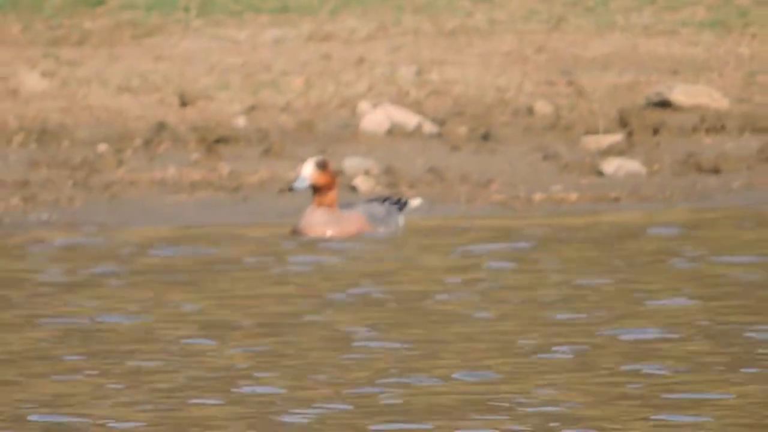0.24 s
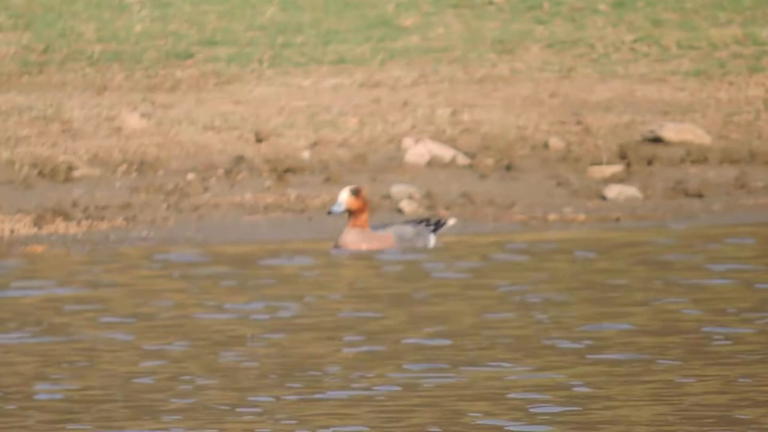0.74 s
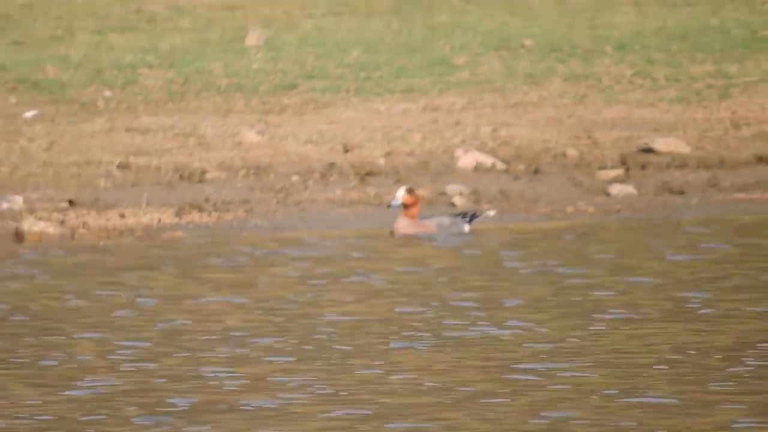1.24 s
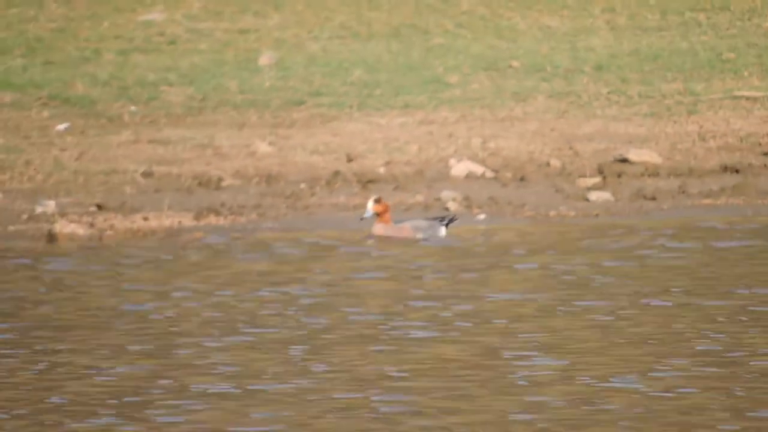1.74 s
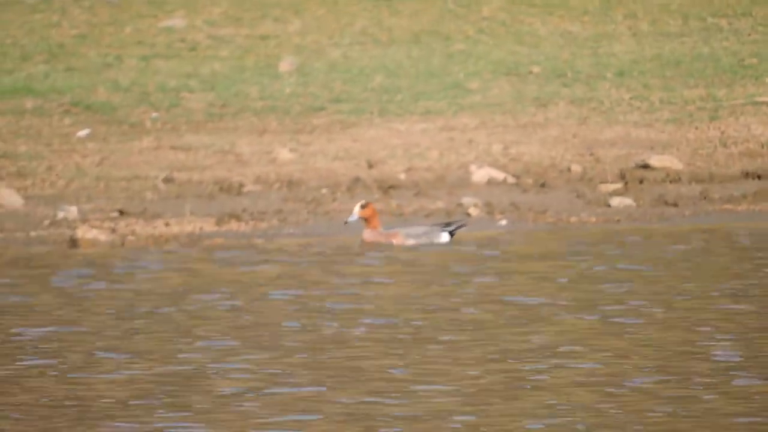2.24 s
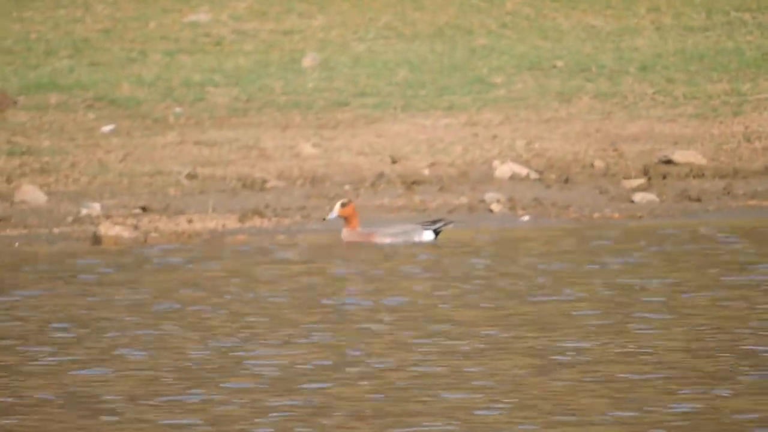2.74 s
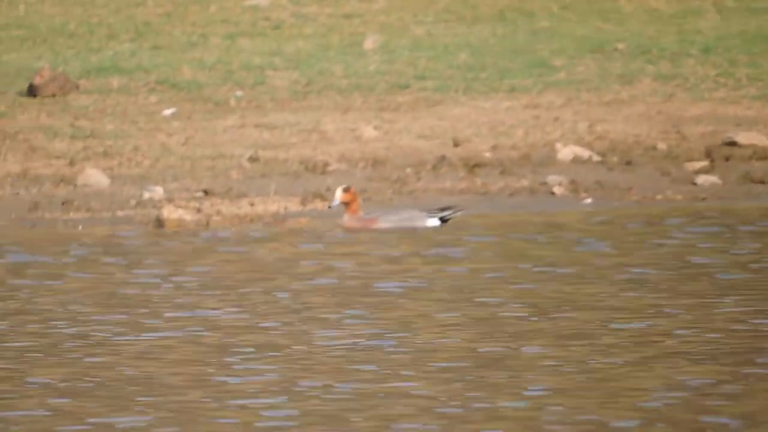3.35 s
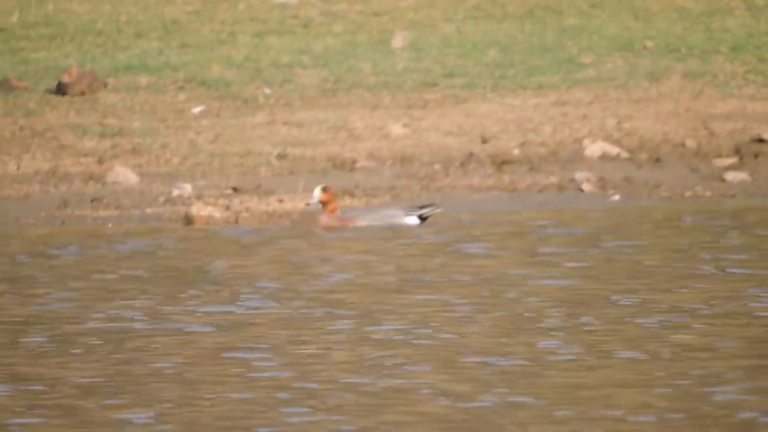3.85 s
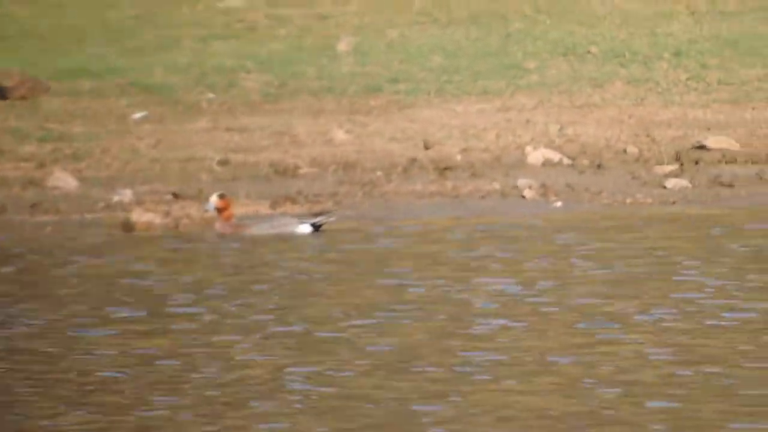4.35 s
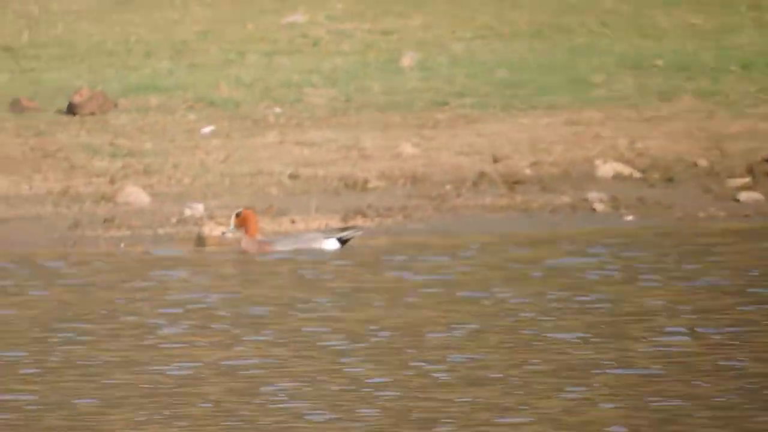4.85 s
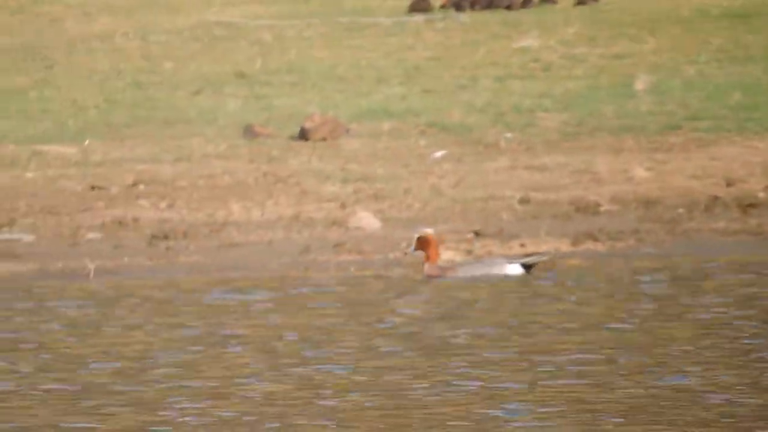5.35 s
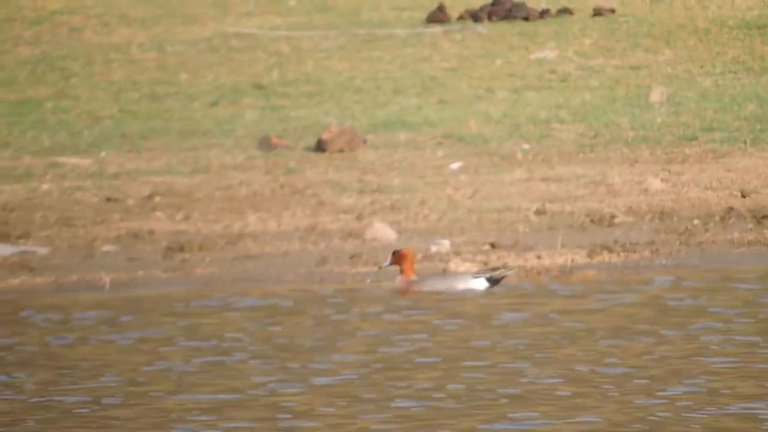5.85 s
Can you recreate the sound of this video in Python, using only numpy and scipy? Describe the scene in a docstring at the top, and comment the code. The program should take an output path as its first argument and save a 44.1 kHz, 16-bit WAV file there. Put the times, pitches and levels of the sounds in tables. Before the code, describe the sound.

Two drake wigeons call across a pond, heard in stereo through a camera's small microphones. From 0 to 1.4 seconds their high, reedy whistles crowd together: brief stuttering pips, smooth peeps, and slides that drop sharply then flick upward. One bird repeats a pattern of pips and a slide near 1.6-2.1 and 2.3-2.8 seconds; the other overlaps with a longer stuttering slide at 2.8. Similar, somewhat fainter groups follow at 3.3-3.8, 4.2-4.7 and 5.0-5.5, with the other bird answering around 3.9-4.3, and a last pip begins just before 6. Soft ripples and airy hiss continue throughout, with faint echoes from the bank. Low wind puffs the right side from 1.3 to 2, then buffets strongly from 2.7, gusting on and off to the end. Tiny dry ticks appear irregularly, the sharpest near 3.9; faint hiss swells around 5-5.8.

```python
"""On a pond, wigeon drakes whistle: their notes start as a stutter of reedy pulses, then hold as a pip
or slide down and flick up. A leader and a companion trade calls, the companion with runs of pips.
Each whistle is a sine at twice the pitch plus other harmonics, most of them weaker; ripples and the bank
send back faint copies. Shaped noise makes the open air, ripples, wind and soft hiss. Gusts buffet the right
one of a camera's two microphone ports, and its body ticks now and then with a snap, a ring and a thump."""
import sys
import numpy as np
from scipy import signal
from scipy.fft import rfft, irfft, next_fast_len
from scipy.io import wavfile
from scipy.ndimage import map_coordinates

SR = 44100
rng = np.random.default_rng(int(sys.argv[2]) if len(sys.argv) > 2 else 0)


def materialize(psi):
    """Save the field psi as 16-bit PCM at rate SR to the path in sys.argv[1].

    A 1-D psi becomes a single channel; in a 2-D psi each row is a channel.
    """
    bounded = np.clip(np.atleast_2d(psi).T, -1, 1)
    quanta = np.round(bounded * 32767).astype(np.int16)
    wavfile.write(sys.argv[1], SR, quanta)


N = 268701  # length in samples


def amp(db):
    """Turn decibels into a gain."""
    return 10 ** (np.asarray(db) / 20)


def unit(x):
    """Scale a sound to rms 1."""
    return x / np.sqrt(np.mean(x ** 2) + 1e-20)


def along(points, hz, axis=1):
    """Read one column of a frequency table, with frequency spaced by ratio as the ear does."""
    table = np.transpose(points)
    return np.interp(np.log(hz + 1), np.log(table[0]), table[axis])


def curve(rows):
    """Join the points of a time table with straight lines, one value per sample."""
    return np.interp(np.arange(N) / SR, *np.transpose(rows))


def clock(length):
    """Sample times of a short sound, in seconds."""
    return np.arange(max(int(length * SR), 8)) / SR


def wobble(rate, size=N):
    """A smooth random curve with `rate` random points a second."""
    points = rng.standard_normal(int(N * rate / SR) + 4)
    return map_coordinates(points, [np.arange(size) * rate / SR])


def add(track, s, x):
    """Mix x into the track at time s."""
    start = max(round(s * SR), 0)
    part = x[..., :N - start]
    track[..., start:start + part.shape[-1]] += part


def filtered(x, response):
    """Change the strength and timing of each frequency in x by a given response."""
    m = next_fast_len(N + SR // 4)  # room for late sound
    return irfft(rfft(x, m) * response(np.fft.rfftfreq(m, 1 / SR)), m)[..., :N]


def sides(pan_db):
    """Left and right gains that keep the total power the same; positive dB favours the left."""
    g = amp(np.array([pan_db, -pan_db]) / 2).reshape(2, -1)
    return g / np.sqrt(np.mean(g ** 2, axis=0))


def rush(spectrum, alike):
    """Coloured stereo noise of rms 1: a shared part plus a part that is opposite on the two sides."""
    def weights(hz):
        turn = np.arccos(np.clip(along(alike, hz), -1, 1)) / 2
        return amp(along(spectrum, hz)) * [np.cos(turn), np.sin(turn)]
    mid, side = filtered(rng.standard_normal((2, N)), weights)
    return unit(np.array([mid + side, mid - side]))


def fade(t, attack, release):
    """Straight-line rise and fall at the ends of a note, given in seconds."""
    return np.clip(t / attack, 0, 1) * np.clip((t[-1] - t) / release, 0, 1)


def reed(t, pitch, opening, overtones, overtone_db, dulling_db=0, chirp=0, jitter=0.0096, shimmer_db=2.5):
    """A whistle on the second harmonic; the others need a wider opening and flutter each in its own way."""
    phase = 2 * np.pi * np.cumsum(pitch * (1 + jitter * wobble(542, len(t)))) / SR
    bend = 2 * np.pi * np.cumsum(pitch * chirp) / SR
    whistle_level = amp(shimmer_db / 2 * wobble(140.5, len(t)))
    tone = opening * np.sin(2 * (phase + bend)) * whistle_level
    for k, db in overtones:
        k = round(k)
        if k > 1:
            level = db + overtone_db - dulling_db * np.log2(k / 2)
        else:
            level = db + overtone_db * 0.12  # the fundamental barely follows the overtones
        flutter = shimmer_db * wobble(152.5, len(t))
        tone += amp(level + flutter) * opening ** 2 * np.sin(k * phase)
    return np.sqrt(2) * tone


# How the two ports hear each bird: f/Hz, left-right level/dB, phase by which left leads/radians
COMPANION_AT_PORTS = [(1260, 10, -1.5), (2200, -4.5, -2), (2500, 1, -1.73), (2600, 3, -2), (3860, 6, -3),
                      (5490, -7.5, -5.5), (6840, -3, -8.5), (7500, -6, -5)]
LEADER_AT_PORTS = [(1340, 15, -1.5), (1800, 2, -2.5), (2160, -5.5, -1.5), (2710, -9, -5), (2800, 3, -4.5),
                   (4320, 0.5, -2), (5150, -12, -5), (6200, -4, -5), (8150, -5, -4.5)]


def at_ports(x, ports):
    """The camera body shades and delays each frequency differently for the two ports."""
    def response(hz):
        lead = along(ports, hz, axis=2)
        return sides(along(ports, hz)) * np.exp(.5j * np.outer([1, -1], lead))
    return filtered(x, response)


# Short smooth whistles (peeps, the end of a pip and the flat end of a slide):
# t/s, length/s, first pitch f/Hz, last pitch f/Hz, level/dB, overtones level/dB
# (as for every whistle here, the sine of the whistle sounds at twice the pitch)
SMOOTH_WHISTLES = [(0, 0.011, 1337, 1250, -44.5, -4.5), (0.108, 0.065, 1250, 1130, -56.5, -1.5),
                   (0.555, 0.036, 1275, 1270, -46, -9), (0.606, 0.03, 1323, 1216, -42, -12.5),
                   (0.639, 0.025, 1072, 1090, -40, -23), (2.465, 0.032, 1240, 1220, -50, -2.5),
                   (2.514, 0.03, 1310, 1170, -42, -11), (3.709, 0.035, 1260, 1236, -47, -4),
                   (3.761, 0.035, 1330, 1136, -43, -6.5)]


def smooth_whistles():
    """Short unstuttered whistles whose pitch slides, most of them downward and faster toward the end."""
    overtones = [(1, -16.5), (3, 4), (4, -4.5), (5, -18.5), (6, -15)]  # multiple of the pitch, level/dB
    out = np.zeros(N)
    for s, length, from_hz, to_hz, db, overtone_db in SMOOTH_WHISTLES:
        t = clock(length)
        pitch = from_hz + (to_hz - from_hz) * (t / t[-1]) ** 2
        whistle = reed(t, pitch, fade(t, 0.0011, 0.0051), overtones, overtone_db)
        add(out, s, amp(db) * whistle)
    return at_ports(out, COMPANION_AT_PORTS)


# Wash of ripples on the shore, before its gain and wobble: t/s, level/dB
RIPPLE_WASH = [(0.0, -65), (0.42, -62), (0.63, -65.5), (3.02, -64.5), (3.12, -63), (5.21, -66.5),
               (6.09, -63.5)]
# Colour of the ripple noise: f/Hz, relative level/dB
RIPPLE_COLOUR = [(300, -19), (700, 1.5), (1100, -0.5), (1600, -2.5), (2100, -3), (3000, -11), (9000, -25.5)]
# Colour of the open-air noise: f/Hz, relative level/dB
AIR_COLOUR = [(180, -3), (300, 0), (378, -1.5), (418, -3.5), (519, -3), (825, -13), (1230, -7), (1310, -25),
              (1450, -28), (2090, -23), (2420, -13), (2910, -13), (15800, -26.5)]
# How alike the air sounds on the two sides: f/Hz, likeness (1 = the same)
AIR_LIKENESS = [(60, 0.28), (180, 0.64), (550, 0.39), (1650, 0.12), (4970, 0.52), (15000, 0.4)]


def pond(air_db=-57, wash_db=3):
    """Nearly steady open-air noise and the uneven wash of ripples."""
    wash_level = amp(curve(RIPPLE_WASH) + wash_db + 2.4 * wobble(12))
    wash = wash_level * rush(RIPPLE_COLOUR, [(1000, 0.39)])
    air_level = amp(air_db + 0.17 * wobble(3.08))
    return air_level * rush(AIR_COLOUR, AIR_LIKENESS) + wash


# Light breeze across both ports: t/s, level/dB
BREEZE_LEVEL = [(0, -48.5), (.8, -52), (2.6, -53), (2.85, -44), (3.45, -37.5), (4.2, -37.5), (5.55, -41),
                (5.9, -44.5)]
# Gusts at the right port, before their gains: t/s, length/s, buffet level/dB,
# upper flutter level/dB relative to the buffet
RIGHT_GUSTS = [(0.054, 0.44, -43.5, -18), (1.315, 0.075, -38, -27), (1.418, 0.12, -29.5, -17),
               (1.586, 0.12, -35.5, -5.5), (1.73, 0.11, -28.5, -15.5), (1.95, 0.047, -40, -25),
               (2.726, 0.067, -31, -16), (2.836, 0.06, -25, -0.5), (2.941, 0.18, -26.5, -12.5),
               (3.204, 0.071, -32.5, -5), (3.427, 0.25, -29.5, -3.5), (3.762, 0.055, -27, -16.5),
               (3.894, 0.082, -31, -10), (4.05, 0.066, -35, -10), (4.28, 0.072, -29.5, -6),
               (4.455, 0.106, -31, -7.5), (4.615, 0.053, -38.5, -9.5), (4.744, 0.071, -37.5, 0.5),
               (4.942, 0.18, -31, -4), (5.201, .13, -28, -4), (5.568, 0.065, -29, -13.5),
               (5.818, .23, -31, -10)]
# Colour of the low buffeting: f/Hz, relative level/dB
BUFFET_COLOUR = [(8, -14), (22, -1), (50, 0), (90, -4.5), (130, -11), (190, -27.5), (400, -72.5)]
# Colour of the higher flutter: f/Hz, relative level/dB
FLUTTER_COLOUR = [(70, -6.5), (130, -2), (190, -8.5), (260, -17.5), (400, -33), (900, -76), (3000, -95)]
# Single eddies striking the right port: t/s, peak level/dB
RIGHT_EDDIES = [(1.45, -24.5), (1.648, -21), (2.841, -19), (2.856, -12.5), (2.882, -22), (2.905, -20),
                (2.975, -17), (3.106, -27), (3.594, -14.5), (3.916, -15.5), (3.964, -12), (4.478, -16),
                (4.952, -20.5)]
GUST_RISE_S, GUST_FALL_S = 0.015, 0.018  # time constants of a gust's edges


def wind(buffet_db=0.86, flutter_db=3, breeze_db=0, breeze_flutter_db=-14, breeze_pan_db=4,
         lump_db=5.0, eddy_s=0.0019):
    """A breeze on both ports and gusts on the right one, in lumps, with single eddies that push then pull."""
    t = np.arange(N) / SR
    low = amp(curve(BREEZE_LEVEL) + breeze_db) * sides(breeze_pan_db)
    high = amp(breeze_flutter_db) * low
    for s, length, db, upper_db in RIGHT_GUSTS:
        before = np.minimum(t - s, 0) / GUST_RISE_S
        after = np.maximum(t - s - length, 0) / GUST_FALL_S
        gust = amp(db) * np.exp(before - after)
        # gust and breeze powers add up
        low[1] = np.hypot(low[1], amp(buffet_db) * gust)
        high[1] = np.hypot(high[1], amp(flutter_db + upper_db) * gust)
    lumps = amp(lump_db * np.array([wobble(28), wobble(28)]))
    buffet = unit(np.sqrt(lumps) * rush(BUFFET_COLOUR, [(50, 0.26)]))
    flutter = unit(lumps * rush(FLUTTER_COLOUR, [(150, 0.029)]))
    out = low * buffet + high * flutter
    u = (clock(.04) - .02) / eddy_s  # time from the middle of an eddy, in eddy widths
    push_pull = -1.6 * u * np.exp(-u ** 2 / 2)
    for s, db in RIGHT_EDDIES:
        add(out[1], s - .02, amp(db) * push_pull)
    return out


def stutter(t, rate, length, shut, edge=0.00096, lead=0.0025, closing=1.1):
    """The syrinx (voice organ) opens in pulses whose gaps shrink to nothing; returns opening and pulse kicks."""
    count, phase = np.divmod((t + lead) * rate, 1)
    gap = (1 - np.clip(count / rate / length, 0, 1) ** closing) * shut
    opening = np.clip(np.minimum(phase, 1 - gap - phase) / rate / edge, 0, 1)
    depth = np.clip((length - t) * rate, 0, 1)
    kick = depth * np.exp(-phase / rate / 0.0012)
    return 1 - depth * (1 - opening), kick


def note(t, pitch, rate, length, overtones, overtone_db, dulling_db, chirp, shut,
         rasp=7, rasp_hz=3150, build=0.0478):
    """A stuttered note: as pressure builds in a long trill, each pulse kicks the whistle sharp with a rasp of air."""
    opening, kick = stutter(t, rate, length, shut)
    opening = opening * fade(t, .0007, 0.0035)
    pitch = pitch * (1 - 0.0696 * np.exp(-t / 0.00838))  # starts a little flat
    swell = amp(-5 * np.exp(-t / 0.0056))  # and a little soft
    force = chirp * np.tanh(t / build) * np.tanh((length / 0.1203) ** 2)
    sharp = force * kick * amp(3.02 * wobble(69.0, len(t)))
    rasp_tone = wobble(900, len(t)) * np.sin(2 * np.pi * rasp_hz * t)
    air = rasp * force * np.sqrt(kick) * opening * rasp_tone
    return swell * (reed(t, pitch, opening, overtones, overtone_db, dulling_db, sharp) + air)


# Pips of each bird: t/s, length/s, pitch f/Hz (before it bends at the ends), level/dB before the bird's
# pip gain, overtones level/dB
BIRD_PIPS = {"leader": [(.061, .073, 1451, -42.5, -9.5), (.745, 0.059, 1365, -38, -10),
             (.888, .11, 1326, -38, -9.5), (3.93, 0.05, 1324, -41.5, -6.5)],
             "companion": [(.173, 0.047, 1405, -43.5, -4), (.272, 0.061, 1403, -43.5, -3.5),
             (.381, 0.066, 1418, -42, -7), (1.06, 0.05, 1396, -40, -8.5), (1.167, .062, 1394, -41.5, -6.5),
             (1.593, 0.049, 1379, -42, -10), (1.696, 0.057, 1392, -42.5, -8.5),
             (1.811, 0.066, 1390, -40, -9.5), (2.318, 0.038, 1304, -46, -9.5),
             (2.422, .049, 1427, -43.5, -5), (2.533, 0.066, 1400, -45, -6.5),
             (3.268, 0.058, 1312, -48, -4.5), (3.382, 0.059, 1325, -51.5, 1), (3.498, .069, 1327, -49.5, 1),
             (4.161, 0.0492, 1284, -45.5, -2.5), (4.274, .058, 1318, -49, -1),
             (4.391, 0.067, 1332, -47, -2), (5.0, 0.036, 1246, -47, -7.5), (5.105, .052, 1313, -48.5, -6),
             (5.22, 0.07, 1320, -49, -4.5), (5.981, 0.047, 1253, -49.5, -10)]}
# Slides of each bird: t/s, length/s, starting pitch f/Hz, stutter pulses per s, level/dB before the bird's
# slide gain, overtones level/dB, middle of the fall after the start t/s, swell during the fall level/dB,
# closing flick level/dB
BIRD_SLIDES = {"leader": [(.199, .21, 1401, 70.5, -41.5, -11, .147, -2.5, -55),
               (1.073, 0.13, 1398, 60, -42, -2.5, .068, 1.5, -48),
               (2.816, .229, 1326, 72.6, -41, -8.5, .18, -5, -51.5),
               (4.087, .198, 1318, 74, -42, -6, 0.14, -1.5, -49.5)],
               "companion": [(.503, .12, 1374, 88, -41, -4.5, 0.091, -7.5, -64),
               (1.291, .14, 1370, 75, -41.5, -7.5, 0.11, -9, -45.5),
               (1.939, .137, 1361, 79, -40.5, -8.5, 0.093, -12.5, -47),
               (2.659, .142, 1366, 85, -39, -5.5, .085, -10, -53.5),
               (3.635, .122, 1261, 85, -48, -3.5, .094, 7, -52),
               (4.519, 0.16, 1304, 78, -46.5, -3.5, .133, 1.5, -52.5),
               (5.361, 0.12, 1280, 73, -53.5, 1, 0.077, 11, -51)]}
# Opening stutter of each bird: pulses per s in a pip, longest stutter of a pip/s,
# stuttered share of a slide's time before the middle of its fall
BIRD_STUTTER = {"leader": (68, 0.075, 0.93), "companion": (68.5, 0.042, 0.45)}
PIP_STUTTER_SHARE = 0.82  # a short pip stutters for this much of its length
# Fall of a slide: low pitch over starting pitch, fall time/s
SLIDE_FALL = {"leader": (.695, .016), "companion": (.69, .025)}
# Where each bird sits as it swims and the camera follows, before the slide offset: t/s, left-right level/dB
BIRD_BEARING = {"leader": [(.2, -1.5), (.8, 1), (1.1, 7.5), (2.8, 2.5)], "companion": [(.3, -1), (1.7, -3),
                (2.5, -.5), (3.5, -2), (4.4, 2), (5.2, 3), (6, -0.5)]}
# Harmonics of each bird, before the overtone level: multiple of the pitch, level/dB
COMPANION_OVERTONES = [(1, -9), (3, 3), (4, -4.5), (5, -11), (6, -9.5), (7, -14), (8, -21.5), (9, -23),
                       (11, -48)]
LEADER_OVERTONES = [(1, -15.5), (3, -4.5), (4, -5), (5, -10.5), (6, -14), (7, -19)]
# How the throat passes sound: f/Hz, level/dB
THROAT_COLOUR = [(900, -10), (1400, -1), (3000, -1), (3400, -4.5), (4000, -0.5), (5200, 0.5), (8100, -1),
                 (8800, -12.5), (9700, -8.5), (15000, -9)]


def drake(bird, overtones, ports, chirp, shut, pip_db, slide_db, dulling_db, purity_db, sag_db, slide_pan_db):
    """One bird's pips and slides, made by its syrinx and coloured by its throat, as the two ports hear them."""
    out = np.zeros((2, N))
    pip_rate, pip_stutter_s, slide_share = BIRD_STUTTER[bird]
    low_ratio, fall = SLIDE_FALL[bird]
    bearing = np.transpose(BIRD_BEARING[bird])
    for s, length, hz, db, overtone_db in BIRD_PIPS[bird]:
        t = clock(length)
        pitch = hz * (1 - 0.081 * np.exp((t - t[-1]) / 0.00827))  # pitch sags as the pressure ends
        stutter_s = min(pip_stutter_s, PIP_STUTTER_SHARE * length)
        tone = note(t, pitch, pip_rate, stutter_s, overtones, overtone_db, 0, chirp, shut)
        add(out, s, amp(db + pip_db) * sides(np.interp(s, *bearing)) * tone)
    for s, length, hz, rate, db, overtone_db, middle, swell_db, _ in BIRD_SLIDES[bird]:
        t = clock(length)
        # a slacker membrane is lower and purer, and finally softer
        fallen = (1 + np.tanh((t - middle) / fall / 2)) / 2
        pitch = hz * (1 - (1 - low_ratio) * fallen)
        purer_db = overtone_db - (swell_db + purity_db) * fallen
        duller_db = dulling_db * np.tanh(3 * fallen)
        tone = note(t, pitch, rate, slide_share * middle, overtones, purer_db, duller_db, chirp, shut)
        level = amp(db + slide_db + swell_db * fallen - sag_db * fallen ** 4)
        pan_db = (np.interp(s, *bearing) + slide_pan_db) * (1 - fallen)
        add(out, s, level * sides(pan_db) * tone)
    return at_ports(filtered(out, lambda hz: amp(along(THROAT_COLOUR, hz))), ports)


# Rising flick that ends a slide: overlap with the slide/s, length/s, first and last pitch over the slide's
# starting pitch, fundamental level/dB
SLIDE_FLICK = {"leader": (0.06, 0.0861, 0.86, 1.16, -2.5), "companion": (.018, .047, 1.0, 1.221, 1.2)}


def flicks():
    """A rising whistle with a strong fundamental that closes every slide."""
    out = np.zeros(N)
    for bird, (overlap, length, first, last, fundamental_db) in SLIDE_FLICK.items():
        t = clock(length)
        overtones = [(1, fundamental_db), (3, -9.5)]
        for s, slide_s, hz, *_, db in BIRD_SLIDES[bird]:
            pitch = hz * (first + (last - first) * (t / t[-1]) ** 1.495)
            flick = reed(t, pitch, fade(t, 0.64 * length, 0.0073), overtones, 0, jitter=0.015)
            add(out, s + slide_s - overlap, amp(db) * flick)
    return at_ports(out, COMPANION_AT_PORTS)


def glints(x, db=-14, count=3):
    """Short detours off the moving ripples make each harmonic come and go."""
    paths = np.zeros((2, N))
    for delay in rng.uniform(.001, .005, count):  # seconds
        late = np.pad(x, ((0, 0), (round(delay * SR), 0)))[:, :N]
        paths += late * np.array([wobble(12), wobble(12)])
    return amp(db) * paths / np.sqrt(count)


def bank(x, delay=0.038, echo_db=-21, tail_db=-21, t60=1.0):
    """One dulled echo from the bank and a thin scatter from the open ground."""
    t = clock(0.39)
    tail = rng.standard_normal((2, len(t))) * amp(-60 * t / t60)
    scatter = signal.fftconvolve(x, tail / np.linalg.norm(tail[0]), axes=1)[:, :N]
    echo = filtered(x, lambda hz: np.exp(-2j * np.pi * hz * delay) / (1 + (hz / 7000) ** 2))
    return amp(echo_db) * echo + amp(tail_db) * scatter


# Ticks of the camera body, before the gains: t/s, knock level/dB, snap level/dB relative to the knock
BODY_TICKS = [(0.219, -46.5, -14), (0.437, -44.5, -16), (0.608, -45.5, -16), (1.281, -46.5, -13),
              (2.534, -49, -10), (2.681, -46, -9), (3.155, -42, -8), (3.288, -42, -16), (3.427, -41.5, -12),
              (3.854, -43, 3.5), (3.876, -34.5, 6), (4.285, -40.5, -14)]
# Ringing tones of the body: f/Hz, level/dB, time to fade by 60 dB/s
BODY_RING = [(1000, 5.5, 0.012), (1242, -6, 0.038), (775, -11, 0.037)]
# Colour of the snap: f/Hz, level/dB
SNAP_COLOUR = [(600, -8), (2000, 1.5), (5000, 3.5), (12000, 2.5), (14000, -6), (16000, -20)]


def ticks(knock_db=1, snap_db=1, thump_db=2, thump_hz=205, thump_t60=0.039):
    """A bright snap, a brief ring of the plastic body mostly at the left port, and a dull thump at the right."""
    knocks, snaps, t = np.zeros((2, N)), np.zeros((2, N)), clock(.04)
    thump = amp(thump_db - 60 * t / thump_t60) * np.sin(2 * np.pi * thump_hz * t)
    ring = sum(amp(level - 60 * t / t60) * np.sin(2 * np.pi * hz * t) for hz, level, t60 in BODY_RING)
    knock = sides(15) * ring + sides(-13.5) * thump
    for s, db, bright_db in BODY_TICKS:
        add(knocks, s, amp(db + knock_db) * knock)
        snap_level = amp(db + snap_db + bright_db - 60 * t / 0.014)
        add(snaps, s, snap_level * rng.standard_normal((2, len(t))))
    return knocks + sides(-8) * filtered(snaps, lambda hz: amp(along(SNAP_COLOUR, hz)))


# Soft, narrow swells of hiss: time of the peak t/s, width/s, peak level/dB
HISS_SWELLS = [(4.99, 0.095, -57), (5.3, 0.057, -57.5), (5.54, 0.02, -60), (5.64, 0.017, -60),
               (5.82, 0.017, -64)]
# Colour of the hiss: f/Hz, relative level/dB
HISS_COLOUR = [(900, -11), (1600, -4), (2000, -4), (2250, -1.5), (2700, -38), (5000, -42)]


def swells():
    """A narrow band of noise rises and sinks a few times along bell-shaped curves."""
    t = np.arange(N) / SR
    level = sum(amp(db) * np.exp(-((t - s) / width) ** 2 / 2) for s, width, db in HISS_SWELLS)
    return level * rush(HISS_COLOUR, [(2000, 0.35)])


def scene():
    """Birds, their reflections, the pond, the wind, the ticking camera body and the hiss."""
    leader = drake("leader", LEADER_OVERTONES, LEADER_AT_PORTS, chirp=.35, shut=0.45, pip_db=2.0,
                   slide_db=2.0, dulling_db=11.5, purity_db=2, sag_db=3, slide_pan_db=-1.5)
    companion = drake("companion", COMPANION_OVERTONES, COMPANION_AT_PORTS, chirp=0.08, shut=0.39, pip_db=2.5,
                      slide_db=2.0, dulling_db=11, purity_db=10.5, sag_db=6, slide_pan_db=-3)
    birds = smooth_whistles() + leader + companion + flicks()
    reflections = glints(birds) + bank(birds)
    return birds + reflections + pond() + wind() + ticks() + swells()


TOP_HZ = 15830  # band limit


def record(dry):
    """The camera keeps nothing from its band limit up, and it blocks steady pressure below about 12 Hz."""
    return filtered(dry, lambda hz: (hz < TOP_HZ) * hz / np.hypot(hz, 12))


dry = scene()
out = record(dry)
materialize(out)
```